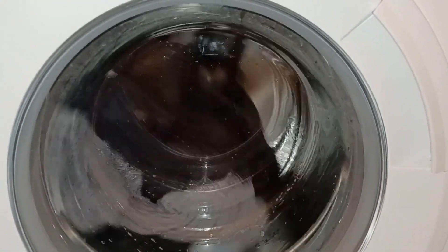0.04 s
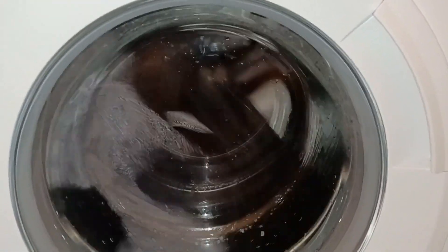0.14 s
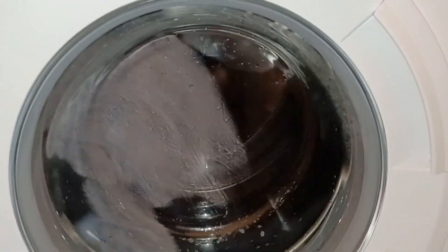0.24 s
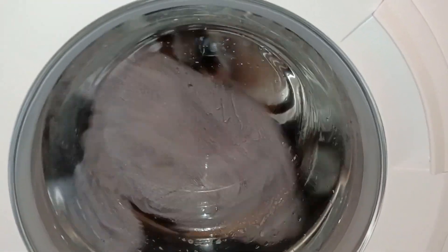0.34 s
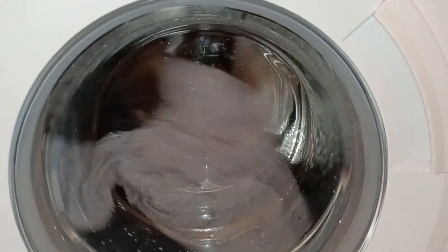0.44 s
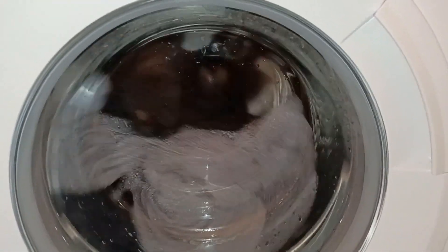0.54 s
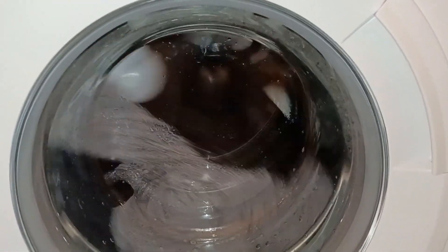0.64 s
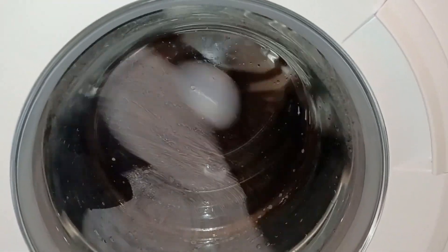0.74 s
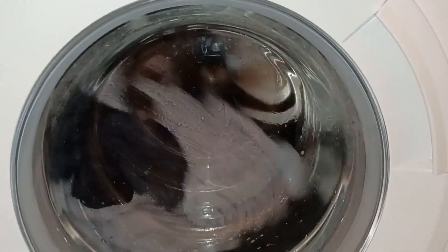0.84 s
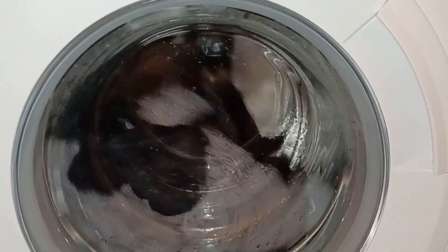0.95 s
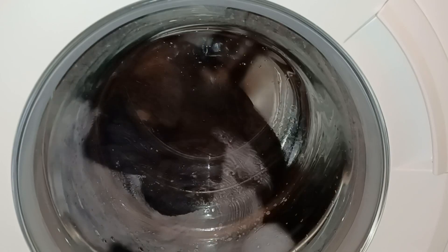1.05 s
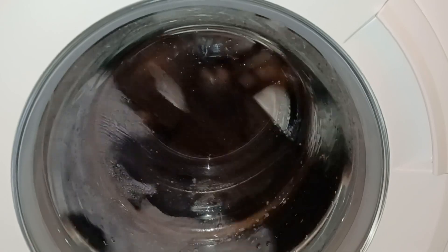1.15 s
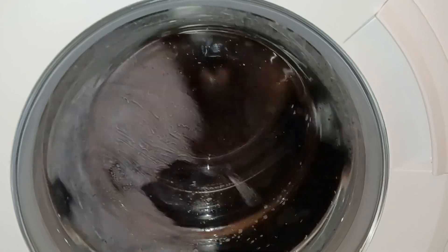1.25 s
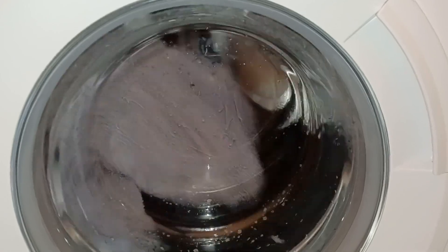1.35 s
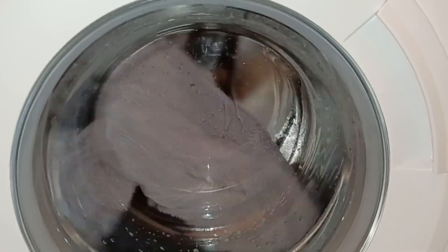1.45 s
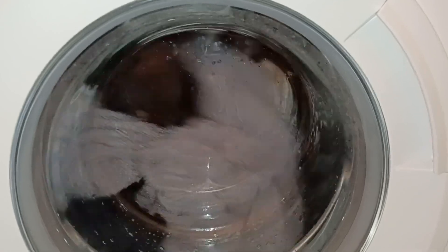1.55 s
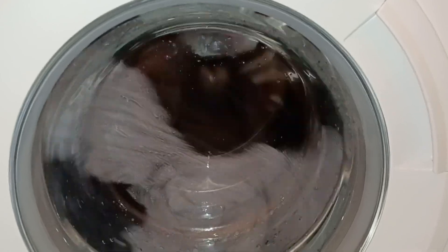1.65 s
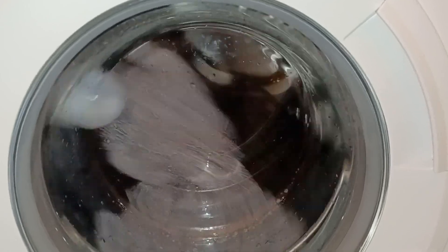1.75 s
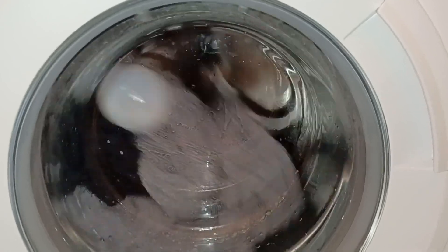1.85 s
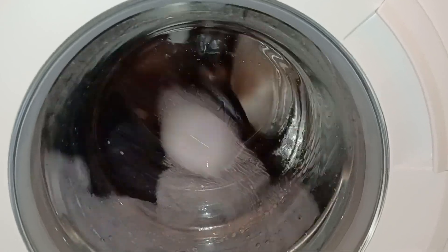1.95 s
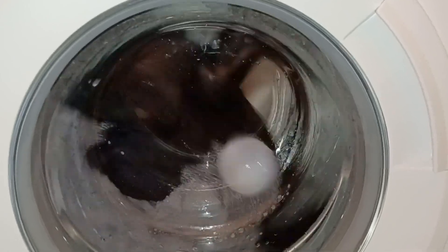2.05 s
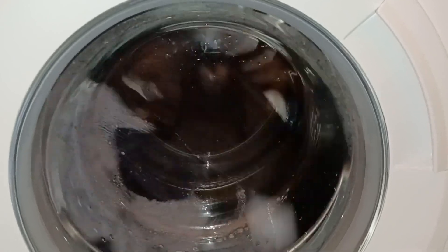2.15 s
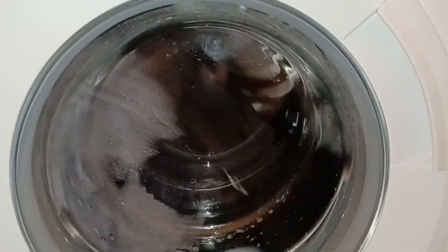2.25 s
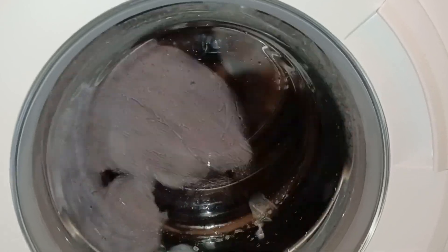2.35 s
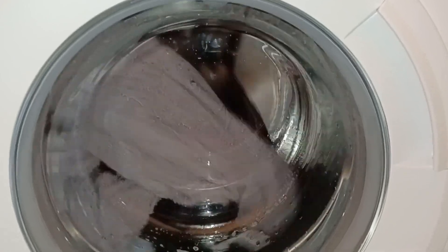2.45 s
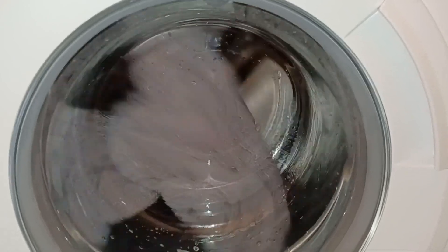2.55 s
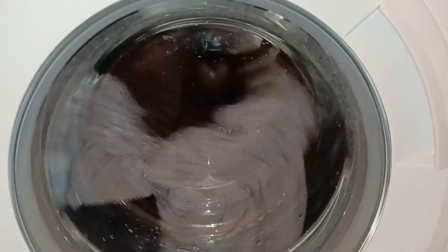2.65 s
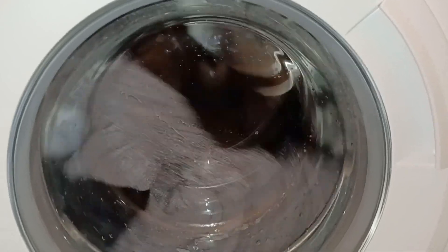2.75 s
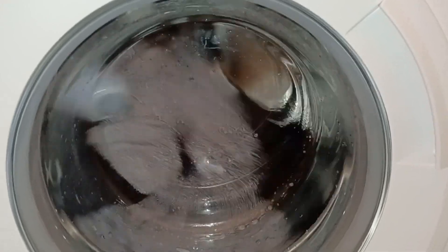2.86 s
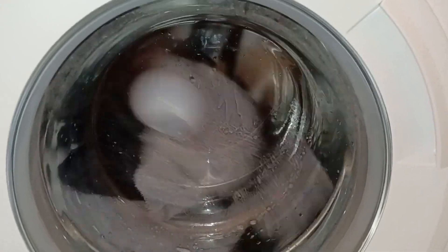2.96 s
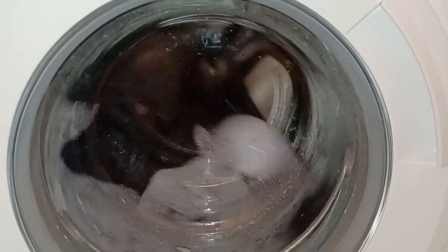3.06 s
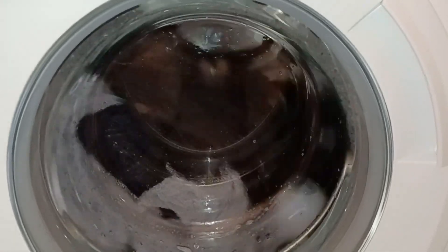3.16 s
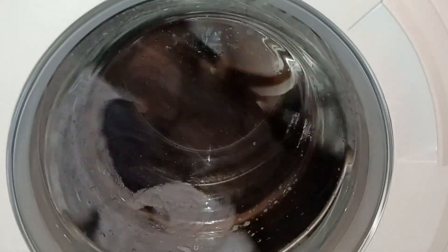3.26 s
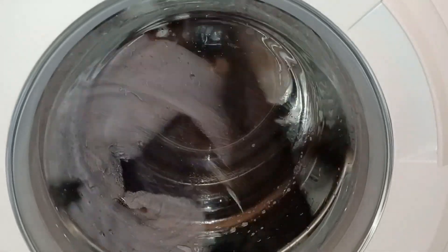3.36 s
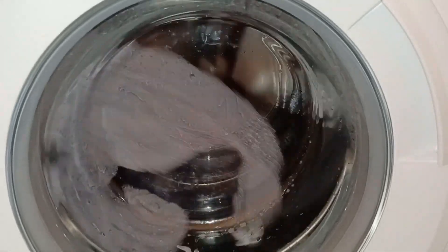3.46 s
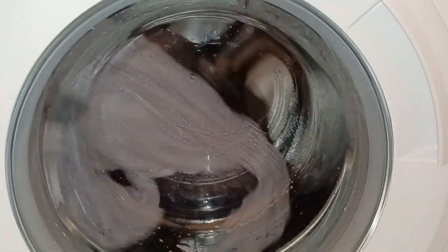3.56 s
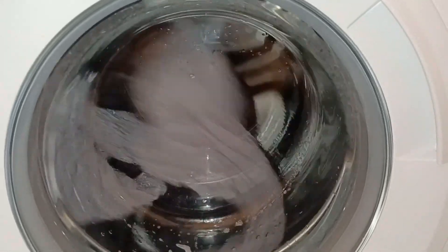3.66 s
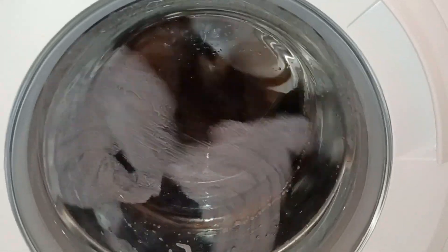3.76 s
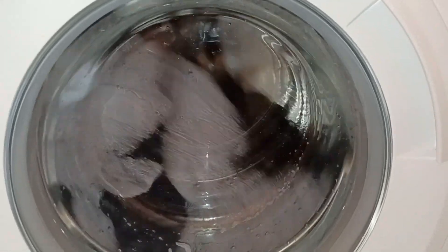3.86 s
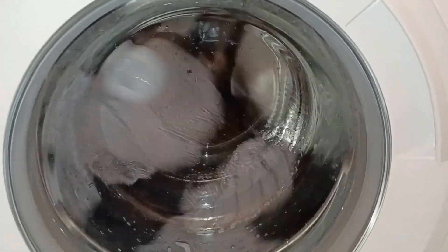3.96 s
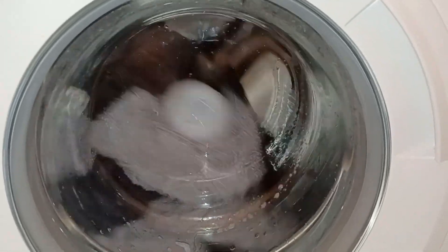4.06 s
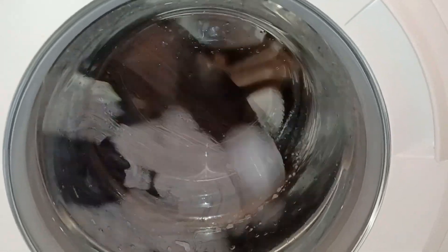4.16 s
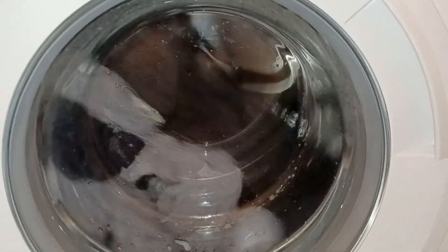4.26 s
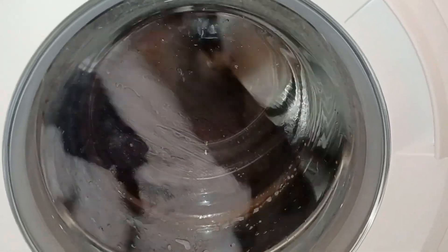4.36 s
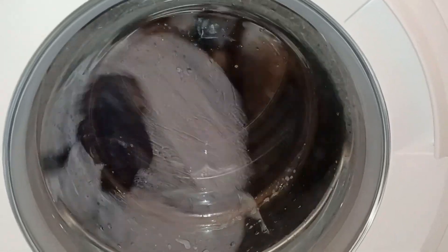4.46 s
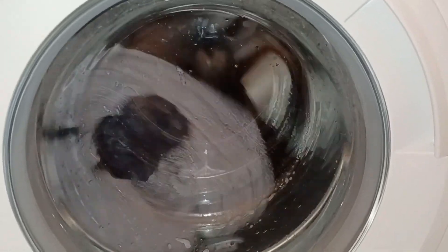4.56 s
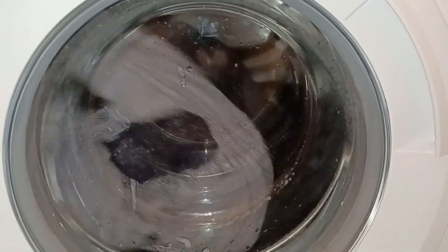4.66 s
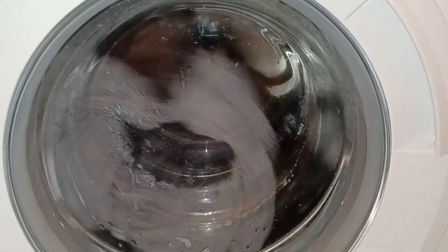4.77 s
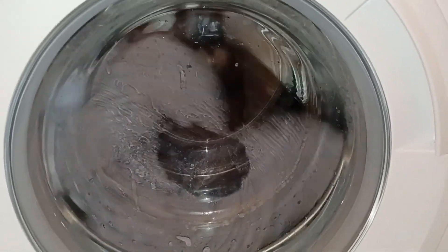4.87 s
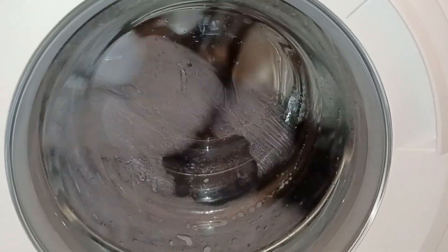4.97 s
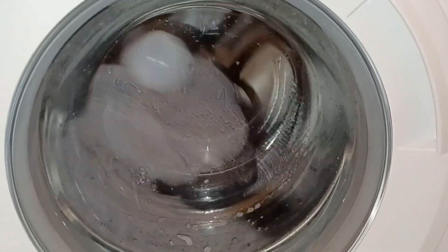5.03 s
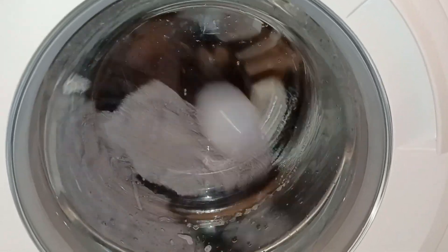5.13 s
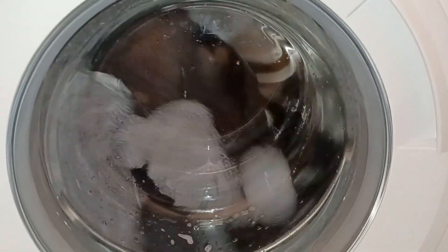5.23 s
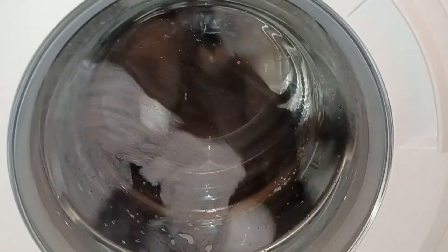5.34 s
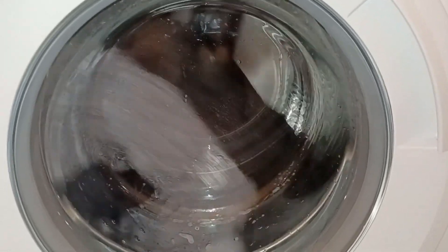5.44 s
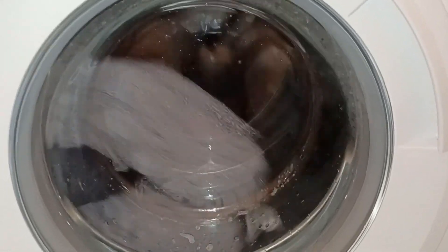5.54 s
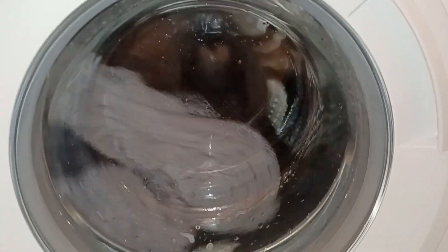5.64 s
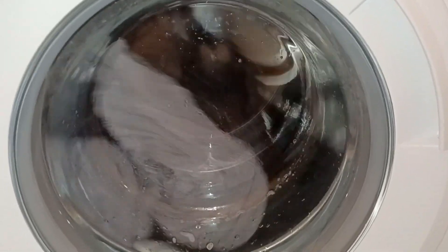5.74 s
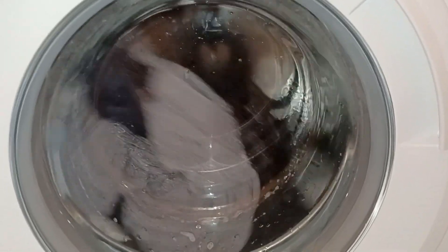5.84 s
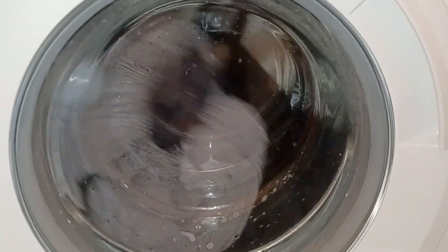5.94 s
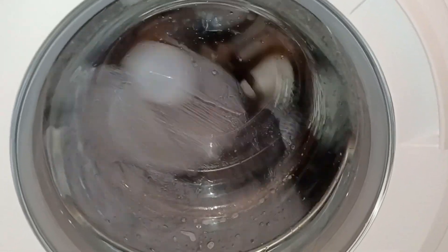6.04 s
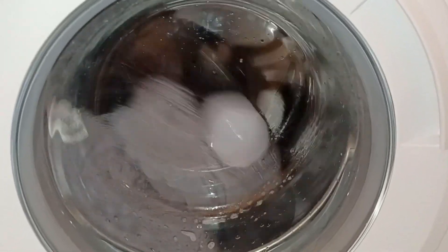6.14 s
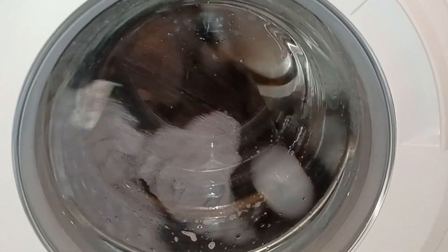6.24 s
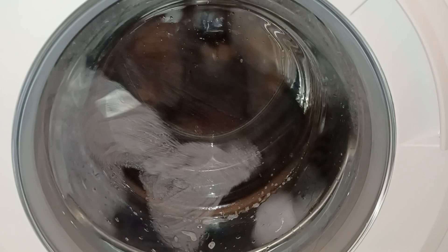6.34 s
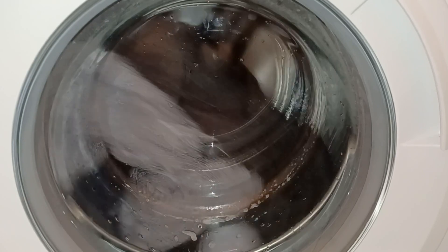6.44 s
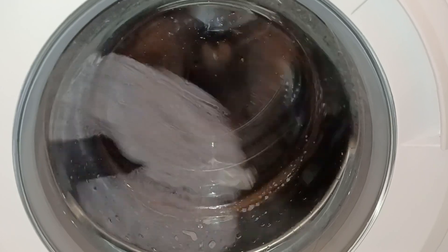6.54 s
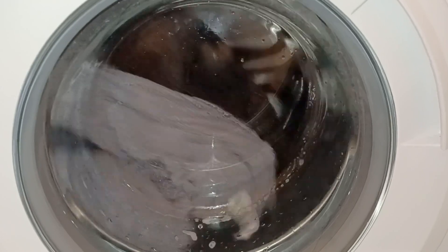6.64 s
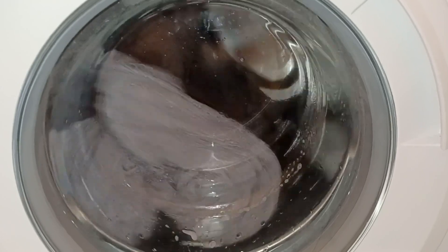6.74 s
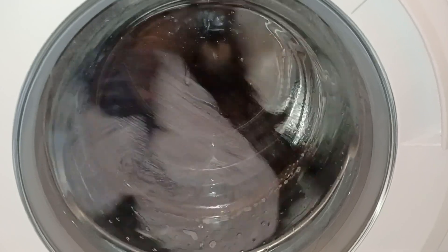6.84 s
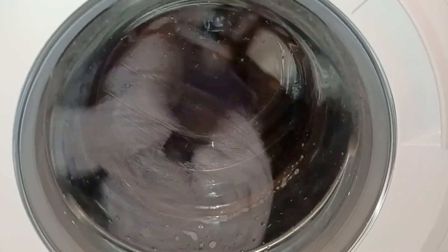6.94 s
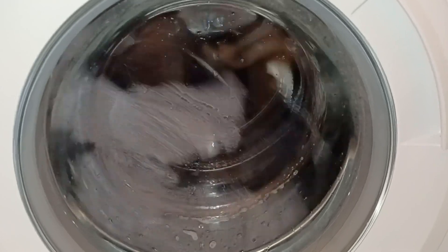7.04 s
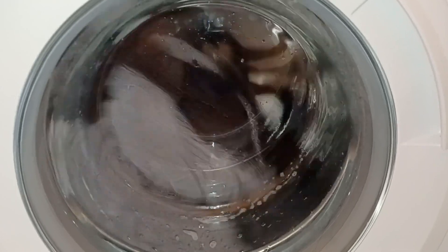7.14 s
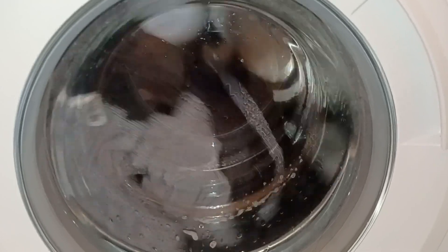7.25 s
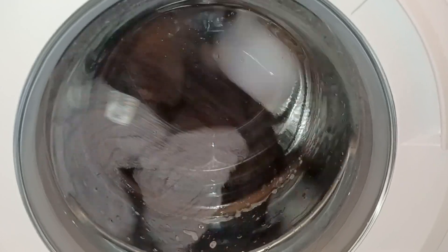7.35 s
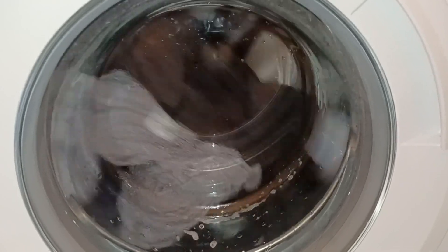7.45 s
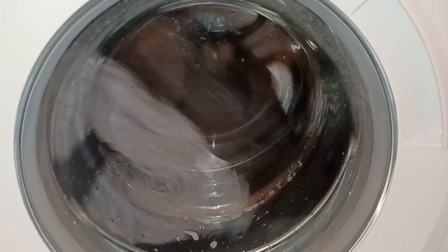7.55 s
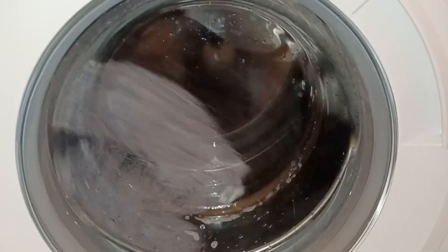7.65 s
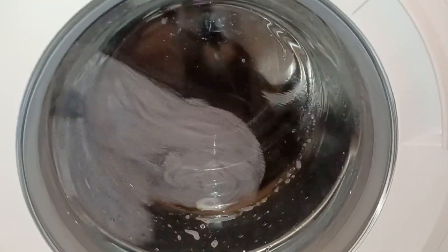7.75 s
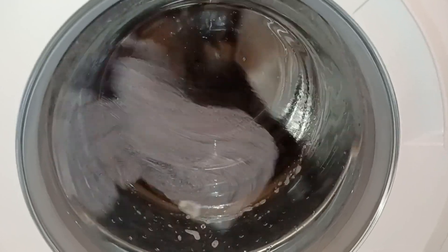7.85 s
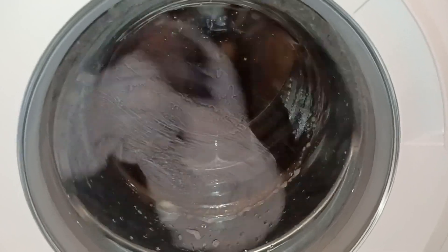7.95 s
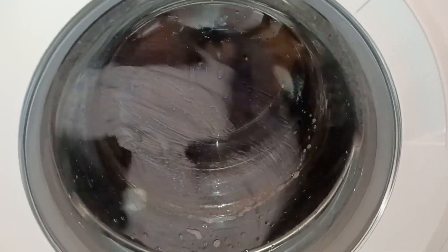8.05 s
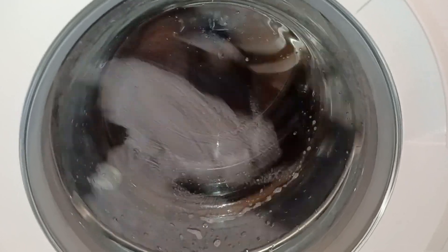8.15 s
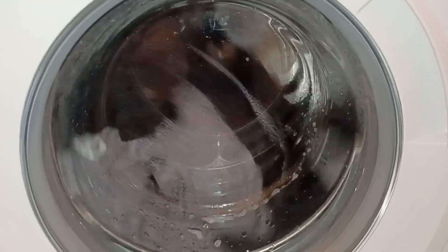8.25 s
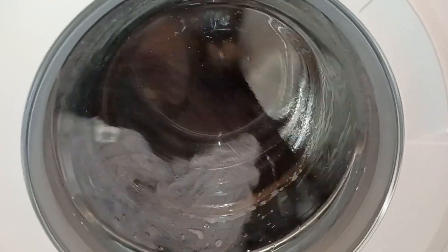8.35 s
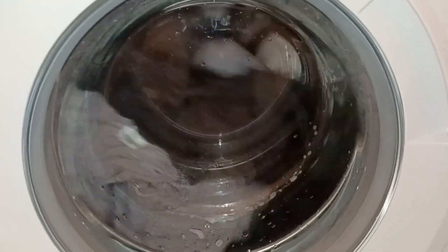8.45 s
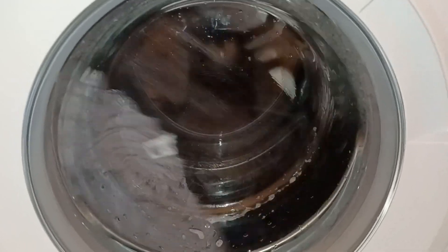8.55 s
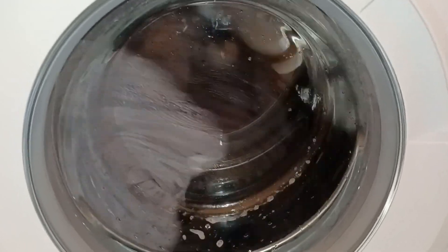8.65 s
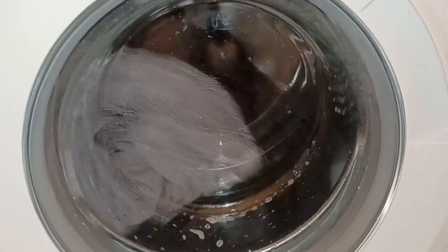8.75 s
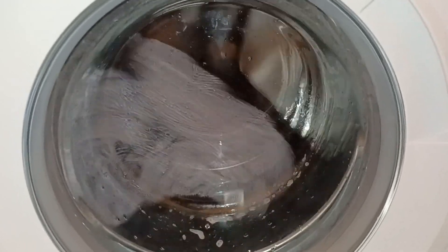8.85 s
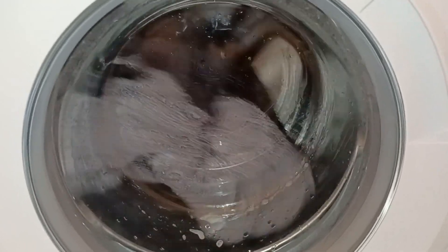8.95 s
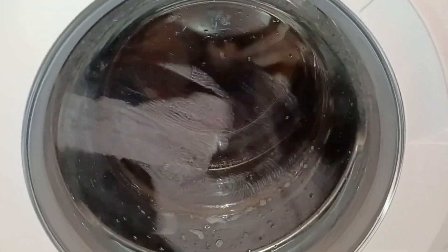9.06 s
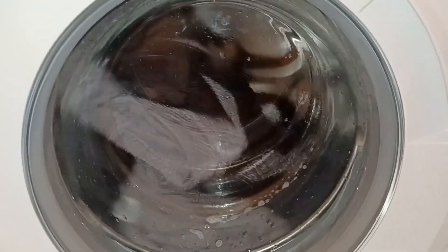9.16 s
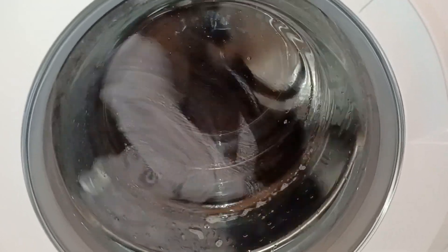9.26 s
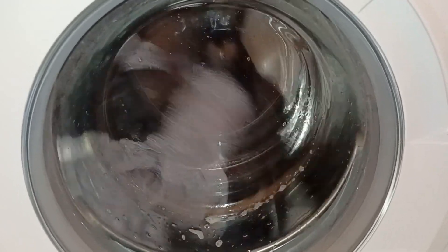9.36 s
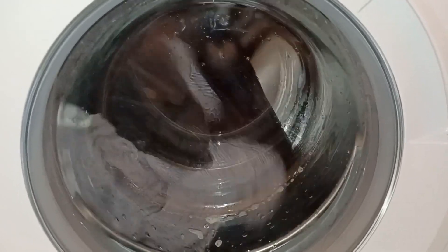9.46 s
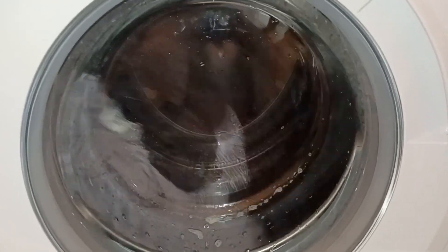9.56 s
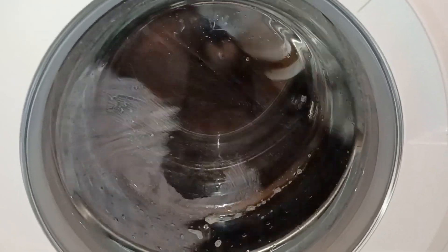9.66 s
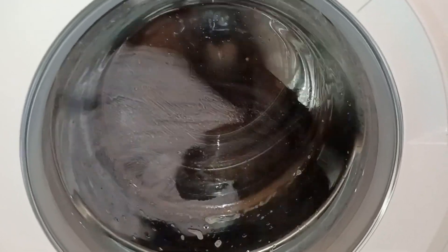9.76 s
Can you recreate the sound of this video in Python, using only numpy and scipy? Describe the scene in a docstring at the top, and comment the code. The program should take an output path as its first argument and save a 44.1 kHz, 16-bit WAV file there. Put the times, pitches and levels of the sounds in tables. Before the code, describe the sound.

Close to a front-loading washing machine, wet cloth flops and slaps about once a second while a hard plastic ball knocks the humming steel drum.

```python
"""Wet load in a washing machine

A front-loading machine turns a wet load about once a second, heard close to its door.
On most turns a plastic dosing ball drops and rings the modes of the steel drum; wet cloth flops as shaped
noise that drives the same modes, and grunts by stick and slip on the door.
Small hard bits ping the glass, cloth slides as patchy noise, and motor lines hum beneath rumble and hiss."""
import sys
import numpy as np
from scipy import signal
from scipy.fft import rfft, irfft
from scipy.io import wavfile
from scipy.ndimage import uniform_filter1d

SR = 44100
rng = np.random.default_rng(int(sys.argv[2]) if len(sys.argv) > 2 else 0)


def transcribe(u):
    """Save the signal u as a 16-bit wav file named by the first command-line argument.

    u: samples, shape (n,) or (channels, n), limited to [-1, 1]; the rate is SR.
    q: integer samples, one column per channel.
    """
    v = np.clip(np.atleast_2d(u).T, -1, 1)
    q = np.round(v * 32767).astype(np.int16)
    wavfile.write(sys.argv[1], SR, q)


N = 432180

# the ball hits drum or door: start_s, force_db, then relative to the force:
# boom_db (tub), clack_db (drum wall), ring_db (bright ring)
BALL_KNOCKS = [(1.831, -27, -5, -6, -16), (1.880, -31, -9.5, -6.5, -15), (1.924, -40, -9, -8, -15),
               (1.961, -36, -6.5, -5.5, -8), (3.151, -36.5, 0, -20, -11.5),
               (4.232, -33, -1.5, -19.5, -13.5), (5.225, -26, -3, -19.5, -9.5),
               (5.254, -30.5, -7.5, -14, -11), (6.233, -25, -3.5, -17.5, -4), (6.261, -32, -8, -10.5, -4.5),
               (7.443, -25.5, -0.5, -8.5, -10.5), (9.692, -43, 9, -29, -20)]
# wet cloth lands: start_s, weight_db, wetness_db, settle_s
CLOTH_FLOPS = [(0.000, -35, -1, 0.0042), (0.060, -33, -1, .02), (0.115, -33.5, -3, .028),
               (0.345, -46, 2, 0.028), (0.824, -48, 1, 0.041), (0.965, -40, -1, 0.0042),
               (1.040, -32.5, 5.5, .012), (1.160, -33.5, -2.5, .02), (1.383, -40, 4.5, 0.02),
               (2.245, -52.5, -1, 0.023), (2.447, -40, -1.5, 0.0032), (3.060, -48.5, 2, 0.047),
               (3.230, -23.5, 8, .011), (3.272, -33, -3, .006), (3.410, -38.5, -1.5, 0.031),
               (3.522, -47, 9.5, 0.013), (3.831, -47, -4, .012), (4.315, -25.5, 1.5, .012),
               (4.581, -44, 6.5, .008), (4.832, -43, -1.5, .005), (4.908, -42, 4, 0.018),
               (5.005, -45, 2.5, 0.012), (5.339, -24, 2.5, 0.0049), (5.440, -30.5, 2, 0.014),
               (5.638, -48.5, 6, 0.009), (6.101, -44, 1.5, 0.0089), (6.362, -32, 0, 0.03),
               (6.420, -30, -1.5, 0.045), (6.699, -45, 1, 0.02), (7.024, -45, -3.5, 0.0095),
               (7.166, -46, 10.5, 0.032), (7.538, -24.5, 0.5, 0.0087), (8.205, -39.5, 3, 0.032),
               (8.390, -54, 9, 0.033), (8.866, -46.5, 6, 0.017), (9.205, -45, 3.5, 0.015),
               (9.686, -43.5, -0.5, 0.021)]
# wet cloth grips the door and shudders: start_s, level_db, pitch_hz, length_s
DOOR_RUBS = [(0.97, -29.5, 283, .052), (1.051, -30, 281.5, 0.074), (1.151, -25.5, 278, 0.041),
             (1.185, -32, 275, 0.043), (3.374, -26, 285, 0.03), (4.344, -27, 298, 0.02),
             (4.505, -34.5, 271, 0.04), (5.359, -24, 308, 0.037), (6, -41, 273, 0.033),
             (6.448, -21, 280.7, 0.042), (7.55, -33, 317, 0.058), (7.19, -43, 264, .04),
             (8.208, -37.5, 292.6, 0.051)]
# small hard bits, likely zips or buttons, touch the glass: start_s, level_db
GLASS_TICKS = [(0.936, -59.5), (1.282, -66), (1.387, -66), (1.534, -58), (2.533, -65), (2.676, -62),
               (2.698, -59.5), (2.975, -66.5), (3.957, -59.5), (3.975, -54.5), (4.510, -58.5),
               (6.429, -59.5)]
# cloth sliding on the drum, joined by straight lines: time_s, level_db
SLIDE_LEVEL = [(0.0, -83), (9.8, -62)]

# modes of the steel drum and its tub: pitch_hz, level_db, t60_s
DRUM_MODES = [(54, -9, 0.96), (77.1, 5.5, 0.42), (78, -27.5, 0.25), (105.2, -7.5, 0.56), (131.1, 1.5, 0.36),
              (167.1, -2, 0.59), (186.4, -6, 0.62), (275, -1.5, 0.42), (250.5, -4, 0.35),
              (294.4, -0.5, 0.24), (310, 0.5, 0.19), (336.3, -13, 0.44), (359.9, 0.5, 0.26),
              (370, -16, 0.74), (398, -19.5, 0.11), (498.3, -3, 0.26), (528, -13.5, 0.68), (540, -12, 0.92),
              (655, -9, 0.21), (704, -15.5, 0.37), (832.6, -2, 0.18), (1040, -28, .3), (1250, -52.5, .3)]
# modes of the drum's bright ring: pitch_hz, level_db, t60_s
STEEL_MODES = [(1444, -8, 0.16), (1509, -0.5, 0.21), (2060, -10.5, .22), (2140, -16, 0.25),
               (2657, -11.5, .18), (3850, -21.5, 0.18), (3962, -28, 0.41), (4060, -26, .34),
               (4220, -27.5, 0.27), (5100, -21, .2), (5650, -24, .25), (7246, -26, 0.31), (7951, -27, .2),
               (8950, -38, .24)]
# modes of the door glass, a short ping: pitch_hz, level_db, t60_s
GLASS_MODES = [(1950, -3, 0.034), (2562, 1.5, 0.05), (3770, -3.5, 0.052), (4150, -10, 0.021),
               (5250, 0, 0.038), (5820, -4.5, 0.033), (6990, -2, .06), (7340, -7.5, 0.093),
               (8070, -6.5, 0.028), (9300, -7.5, 0.045), (9100, -16.5, 0.056), (11100, -21, .04),
               (12200, -27, .03)]
# mains line first, then motor lines: pitch_hz, level_db
HUM_LINES = [(100, -57.5), (167, -62.5), (199.5, -62.5), (263, -62), (490, -72.5), (560, -74), (1200, -79)]
# hissing cabinet resonances: pitch_hz, width_hz, level_db
CABINET_BANDS = [(1071, 52, -74.5), (1770, 150, -77), (4030, 310, -84.5), (5500, 100, -88),
                 (9900, 370, -100)]

# spectrum of the ball's crack: frequency_hz, level_db
CRACK_COLOUR = [(40, -37), (150, 5), (380, -4.5), (700, -14.5), (1500, -18), (3000, -28), (4000, -18),
                (6000, -28), (8000, -31), (15000, -30)]
# spectrum of landing and sliding cloth: frequency_hz, level_db
CLOTH_COLOUR = [(40, -13), (90, -22.5), (170, -4), (310, 0), (440, -6), (740, -6.5), (1000, -7.5),
                (1500, -23), (2300, -31), (3000, -35.5), (4000, -34.5), (6000, -44.5), (9000, -51.5),
                (15000, -58.5)]
# spectrum of hard contacts and of suds: frequency_hz, level_db
TICK_COLOUR = [(800, -21), (2000, 1.5), (2700, -0.5), (3300, -10.5), (4200, -2), (6000, -7.5), (8000, -7.5),
               (11000, -9), (15000, -10.5)]
# spectrum of the bearing rumble: frequency_hz, level_db
RUMBLE_COLOUR = [(25, -58.5), (42, -34.5), (58, -11), (78, -1.5), (120, -9), (172, -2), (220, -6.5),
                 (270, -2), (410, -18.5), (600, -17), (1150, -26), (2500, -35), (8000, -46), (15000, -49)]
# decay of drum cavity and room: frequency_hz, t60_s
ECHO_DECAY = [(80, 1), (300, 0.37), (1000, 0.36), (4000, 0.39), (14000, 0.14)]
# gain of the side channel: frequency_hz, gain_db
SIDE_WIDTH = [(60, -24.5), (120, -14), (240, -12.5), (480, -5.5), (950, 0), (1890, 0.5), (3770, 0),
              (7520, 0), (15000, 0.5)]
# filter gain of left over right: frequency_hz, difference_db
LEFT_LEAN = [(60, 2.5), (120, 0), (200, -2.5), (380, 0), (700, 0), (1290, -1), (2380, -1.5), (4400, -7),
             (8120, -3), (13000, -2.5)]

EDGE_HZ = 15850  # upper band limit
LENGTH = 24576  # samples in one event
T = np.arange(LENGTH) / SR

# a fold of FULL_DB weight and plain wetness sets the scale for the other landings
FULL_DB = -26
SLAP_DB, SLAP_PER_WET = -10.5, 0.96  # slap relative to the weight; dB gained per dB of wetness
FADE_S, DRYING_DB = 0.057, 12.5  # wet folds stick: the fade time halves with every DRYING_DB of wetness
# only heavy, wet folds squelch: dB of a full fold; dB gained per dB of weight and of wetness
SQUELCH_DB, SQUELCH_PER_WEIGHT, SQUELCH_PER_WET = -38.5, 2.27, 1.14
# heavier folds trap larger, lower pockets: dB of weight per octave
POCKET_HZ, POCKET_OCTAVE_DB = 642, 19.5
HEAVE_DB, HEAVE_HZ = -23, 117  # swing of the tub, relative to the weight
SPIT_DB, SPIT_PER_WET = -49, 1.34  # spit of water from a full fold; dB gained per dB of wetness
SPIT_LINGER = 1.45  # the spit outlasts the weight by this factor
HISS_DB, HISS_PER_WET = -47, 1  # hiss of a full fold; dB gained per dB of wetness
SQUEEZE_PER_WEIGHT = .8  # dB of hiss and spit gained per dB of weight
# small folds shifting between the landings
STIRS_PER_S, STIR_DB, STIR_SPREAD_DB, STIR_WET_DB, STIR_SETTLE_S = 2, -56, 2, 2.5, .025
# click of a full-force knock on the bare wall; dB per dB of force and of clack
CLICK_DB, CLICK_PER_FORCE, CLICK_PER_CLACK = -46, 0.72, 0.24
# shares of steel and glass in a knock; dB of steel per dB of ring
STEEL_DB, STEEL_PER_RING, GLASS_DB = -0.5, 1.08, -11.5
# a bare clack swings the tub at TUB_HZ, a cushioned one lower: dB of clack per octave
TUB_HZ, TUB_OCTAVE_DB = 145, 58


def amp(db):
    """Logarithmic level: decibels to amplitude gain."""
    return 10 ** (np.asarray(db) / 20)


def evened(x):
    """Power normalisation: each row at rms 1."""
    return x / np.sqrt(np.mean(x ** 2, -1, keepdims=True) + 1e-30)


def unit(x):
    """Energy normalisation: each row at energy 1."""
    return evened(x) / np.sqrt(x.shape[-1])


def peaked(x):
    """Short-time power: each row with its loudest few milliseconds at rms 1."""
    power = uniform_filter1d(x ** 2, size=280, mode="constant")
    power = uniform_filter1d(power, size=280, mode="constant")
    return x / np.sqrt(power.max(-1, keepdims=True) + 1e-30)


def read(points, hz):
    """Interpolation of a spectrum table along a logarithmic frequency axis."""
    f, value = np.transpose(points)
    return np.interp(np.log(hz + 1), np.log(f + 1), value)


def coloured(x, points):
    """Zero-phase filtering: the spectrum is multiplied by a table of gains in dB."""
    size = x.shape[-1]
    gain = amp(read(points, np.fft.rfftfreq(size, 1 / SR)))
    return irfft(rfft(x) * gain, size)


def noise(points, size=LENGTH):
    """Coloured noise, independent in the mid and side channels."""
    return evened(coloured(rng.standard_normal((2, size)), points))


def drift(rate, size=LENGTH):
    """Random modulation: straight lines between normal deviates, rate of them a second."""
    knots = rng.standard_normal(int(size / SR * rate) + 3)
    return np.interp(np.arange(size) / SR * rate, np.arange(len(knots)), knots)


def band(x, lo_hz, hi_hz):
    """Causal Butterworth band-pass."""
    sos = signal.butter(3, [lo_hz, min(hi_hz, .49 * SR)], "band", fs=SR, output="sos")
    return signal.sosfilt(sos, x + 1e-20)


def through(x, response):
    """Linear system: each channel is convolved with its impulse response."""
    return signal.fftconvolve(x, response, axes=-1)[:, :x.shape[-1]]


def add(mix, s, sound):
    """Superposition: a sound is summed into the mix at time s."""
    part = mix[:, max(round(s * SR), 0):][:, :sound.shape[1]]
    part += sound[:, :part.shape[1]]


def ringing(modes):
    """Modal decay: dying sines, neighbours in opposite phase, mid and side a quarter cycle apart."""
    hz, db, t60 = np.transpose(modes)[:, :, None]
    signs = (-1) ** np.arange(len(modes))
    swings = signs @ (amp(db - 60 * T / t60) * np.exp(2j * np.pi * hz * T))
    side = swings.real * (1 - np.exp(-T / .001))
    return unit(np.array([swings.imag, side]))


def echo():
    """Diffuse reverberation: dense reflections of drum and room, decaying at a rate set by frequency."""
    hz, t, z = signal.stft(rng.standard_normal((2, LENGTH)), SR, nperseg=256)
    decay = amp(-60 * t / read(ECHO_DECAY, hz)[:, None])
    tail = signal.istft(z * decay, SR, nperseg=256)[1][:, :LENGTH]
    return unit(tail * (1 - np.exp(-T / 0.008)))


def high_hiss(start_s=1.85, hiss_db=-86):
    """Narrow-band noise: a thin, very high hiss sets in and stays."""
    shape = [(14300, -50), (14650, -2), (15700, 0), (16200, -40)]  # frequency_hz, level_db
    return amp(hiss_db) * noise(shape, size=N) * (np.arange(N) / SR > start_s)


def motor(rumble_db=-55.5, rumble_waver_db=3.7, waver_db=2, wander_hz=1.53):
    """Steady and modulated tones: a mains line, wavering motor lines, bearing rumble and cabinet hiss."""
    t = np.arange(N) / SR
    out = amp(rumble_db + rumble_waver_db * drift(11, size=N)) * noise(RUMBLE_COLOUR, size=N)
    for hz, width, db in CABINET_BANDS:
        resonator = signal.iirpeak(hz, hz / width, fs=SR)
        out += amp(db) * evened(signal.lfilter(*resonator, rng.standard_normal((2, N))))
    for k, (hz, db) in enumerate(HUM_LINES):
        loose = k > 0  # the first line is locked to the mains, the others waver with the load
        turns = hz * t + loose * wander_hz * np.cumsum(drift(13, size=N)) / SR
        level = amp(db + loose * waver_db * drift(2.4, size=N))
        out += np.sqrt(2) * level * np.sin(2 * np.pi * (turns + rng.random((2, 1))))
    return out


def sliding(drum, drum_db=-3, patchy_db=2, fizz_db=-20, fizz_patchy_db=2.5):
    """Friction noise: cloth drags over the turning drum, with a faint fizz of suds in its weave."""
    pressure = amp(np.interp(np.arange(N) / SR, *np.transpose(SLIDE_LEVEL)))
    drag = noise(CLOTH_COLOUR, size=N) * amp(patchy_db * drift(14, size=N))
    drag = evened(drag + amp(drum_db) * evened(through(drag, drum)))
    fizz = noise(TICK_COLOUR, size=N) * amp(fizz_db + fizz_patchy_db * drift(24, size=N))
    return pressure * (drag + fizz)


def ticks(glass, tick_s=0.006, glass_db=-3, echo_db=-3):
    """Impulsive excitation: tiny dry contacts ping the modes of the door glass."""
    out, cavity = np.zeros((2, N)), echo()
    for s, db in GLASS_TICKS:
        tick = unit(noise(TICK_COLOUR) * np.exp(-T / tick_s))
        ping = unit(through(tick, glass))
        sound = tick + amp(glass_db) * ping + amp(echo_db) * through(tick, cavity)
        add(out, s, amp(db) * peaked(sound))
    return out


def rubs(drum, jitter=0.057, second_db=-22, third_db=-29, drum_db=-11, echo_db=-13):
    """Stick and slip on the wet door: a short low harmonic grunt that also shakes the drum."""
    out, cavity = np.zeros((2, N)), echo()
    for s, db, hz, length in DOOR_RUBS:
        grip = np.sin(np.pi * np.minimum(T / length, 1)) ** 2
        phase = 2 * np.pi * np.cumsum(hz * (1 + jitter * drift(120))) / SR
        phase = phase + np.array([[0], [2]])  # the side channel is out of step with the mid
        harmonics = np.sin(phase) + amp(second_db) * np.sin(2 * phase) + amp(third_db) * np.sin(3 * phase)
        grunt = np.sqrt(grip) * harmonics
        shake = peaked(through(grip * noise(CLOTH_COLOUR), drum))
        reflected = peaked(through(grunt, cavity))
        add(out, s, amp(db) * peaked(peaked(grunt) + amp(drum_db) * shake + amp(echo_db) * reflected))
    return out


def boom(drum, centre_hz, swell_s):
    """Inertia: the heavy tub takes a moment to start swinging in its lowest modes."""
    return peaked(band(drum * (1 - np.exp(-T / swell_s)), centre_hz / 1.54, centre_hz * 1.82))


def stirs():
    """Random arrivals: one small fold shifts at a random moment in each equal slot of time."""
    chance = rng.random((round(STIRS_PER_S * N / SR), 2))
    folds = []
    for k, (when, size) in enumerate(chance):
        weight_db = STIR_DB + STIR_SPREAD_DB * (2 * size - 1)
        folds.append(((k + when) / STIRS_PER_S, weight_db, STIR_WET_DB, STIR_SETTLE_S))
    return folds


def squelch(weight_db, wet_db, sharpness=3.4, rise_s=0.0051, fade_s=0.067):
    """Cavity resonance: a pocket of wet cloth resonates broadly as it collapses."""
    hz = POCKET_HZ * 2 ** ((FULL_DB - weight_db) / POCKET_OCTAVE_DB)
    db = SQUELCH_DB + SQUELCH_PER_WEIGHT * (weight_db - FULL_DB) + SQUELCH_PER_WET * wet_db
    rush = rng.standard_normal((2, LENGTH)) * np.minimum(T / rise_s, 1) * np.exp(-T / fade_s)
    return amp(db) * peaked(band(rush, hz / (1 + 0.79 / sharpness), hz * (1 + 0.6 / sharpness)))


def flops(drum, lumpy_db=2.0, drum_db=-4, slap_ring_db=-1, echo_db=-4, hiss_lead=0.24, spatter_db=3):
    """Distributed impact: water spits and hisses first, then lumpy folds drive the drum and heave the tub."""
    out, cavity = np.zeros((2, N)), echo()
    heave = boom(drum, centre_hz=HEAVE_HZ, swell_s=0.044)
    for s, body_db, wet_db, settle_s in CLOTH_FLOPS + stirs():
        slap_db = body_db + SLAP_DB + SLAP_PER_WET * wet_db
        squeeze_db = SQUEEZE_PER_WEIGHT * (body_db - FULL_DB)
        hiss_db = HISS_DB + squeeze_db + HISS_PER_WET * wet_db
        spit_db = SPIT_DB + squeeze_db + SPIT_PER_WET * wet_db
        fade_s = FADE_S / 2 ** (wet_db / DRYING_DB)
        water_s = hiss_lead * settle_s  # water reaches its peak before the weight does

        folds = noise(CLOTH_COLOUR) * amp(lumpy_db * drift(177.2))
        weight, water = (folds * np.minimum(T / rise, 1) * np.exp(-np.maximum(T - rise, 0) / fade_s)
                         for rise in (settle_s, water_s))
        shaken = through(weight, drum)
        body = unit(band(weight, 130, 426)) + amp(drum_db) * unit(band(shaken, 110, 540))
        slap = unit(band(weight, 520, 1293)) + amp(slap_ring_db) * unit(band(shaken, 454, 1200))

        water = water * amp(spatter_db * drift(900))  # droplets break the hiss into grains
        hiss = band(water + amp(echo_db) * through(water, cavity), 1144, 18000)
        jet = noise(CLOTH_COLOUR) * amp(spatter_db * drift(300))
        jet = jet * np.minimum(T / water_s, 1) * np.exp(-T / (SPIT_LINGER * fade_s))
        spit = band(band(jet, 1160, 2640), 1160, 2640)

        layers = [(body_db, body), (slap_db, slap), (hiss_db, hiss), (spit_db, spit)]
        add(out, s, sum(amp(db) * peaked(layer) for db, layer in layers))
        add(out, s + settle_s / 2, squelch(body_db, wet_db) + amp(body_db + HEAVE_DB) * heave)
    return out


def knocks(drum, steel, glass, crack_s=0.0063, push_s=0.00047, push_db=-2, drum_db=1, echo_db=-6,
           rattle_db=-15, rattle_s=0.12, grain_db=4, zing_db=-18.5):
    """Modal excitation by impact: push and crack ring drum, steel and glass, each register by its own level."""
    out = np.zeros((2, N))
    push = unit((T / push_s - 1) * np.exp(-T / push_s)) * np.array([[1], [.5]])  # half as strong in the side
    zing = peaked(band(steel, 3830, 4200))  # the bare drum wall rings on, high up
    for s, db, boom_db, clack_db, ring_db in BALL_KNOCKS:
        crack = unit(noise(CRACK_COLOUR) * np.exp(-T / crack_s))
        direct = crack + amp(push_db) * band(push, 60, 880)
        ring = amp(drum_db) * drum + amp(STEEL_DB + STEEL_PER_RING * ring_db) * steel + amp(GLASS_DB) * glass
        # the ball chatters on the perforated steel as it settles
        grains = amp(grain_db * drift(400)) * np.exp(-T / rattle_s)
        rattle = unit(band(noise(CRACK_COLOUR), 1300, 12000) * grains)
        hit = direct + ring + amp(rattle_db) * rattle + amp(echo_db) * through(direct, echo())

        # where the ball lands decides the strength of each register: level_db, low_hz, high_hz
        click_db = CLICK_DB + CLICK_PER_FORCE * (db - FULL_DB) + CLICK_PER_CLACK * clack_db
        registers = [(db, 255, 440), (db + clack_db, 520, 1250),
                     (db + ring_db, 1350, 3000), (click_db, 3400, 16000)]
        add(out, s, sum(amp(level) * peaked(band(hit, lo, hi)) for level, lo, hi in registers))
        add(out, s, amp(db + clack_db + zing_db) * zing)
        tub_hz = TUB_HZ * 2 ** (clack_db / TUB_OCTAVE_DB)
        add(out, s, amp(db + boom_db) * boom(drum, centre_hz=tub_hz, swell_s=0.019))
    return out


def scene():
    """Superposition of all sources as mid and side; bass is nearly mono, treble wide and leaning right."""
    drum, steel, glass = ringing(DRUM_MODES), ringing(STEEL_MODES), ringing(GLASS_MODES)
    load = knocks(drum, steel, glass) + flops(drum) + rubs(drum) + ticks(glass) + sliding(drum)
    mid, side = load + motor() + high_hiss()
    side = coloured(side, SIDE_WIDTH)
    channels = []
    for sign in (1, -1):  # left, then right
        lean = [(hz, sign * db / 2) for hz, db in LEFT_LEAN]
        channels.append(coloured(mid + sign * side, lean))
    return np.array(channels)


def record(dry):
    """Band limitation: a symmetric low-pass filter removes the highest treble."""
    lowpass = signal.firwin(511, EDGE_HZ, window=("kaiser", 9), fs=SR)
    return signal.oaconvolve(dry, lowpass[None], "same")


dry = scene()
out = record(dry)
transcribe(out)
```